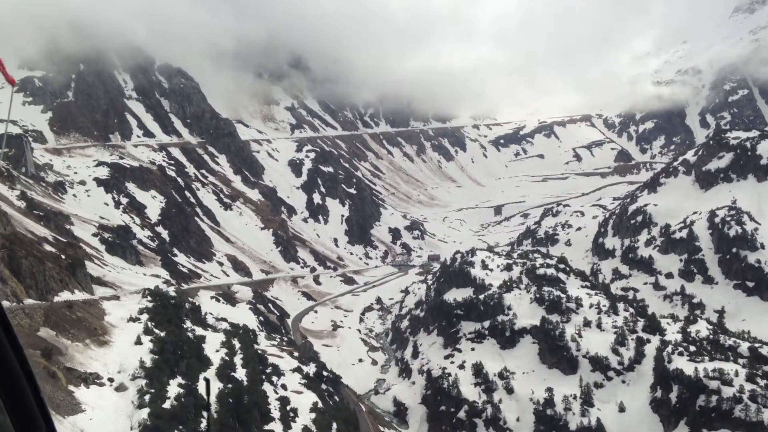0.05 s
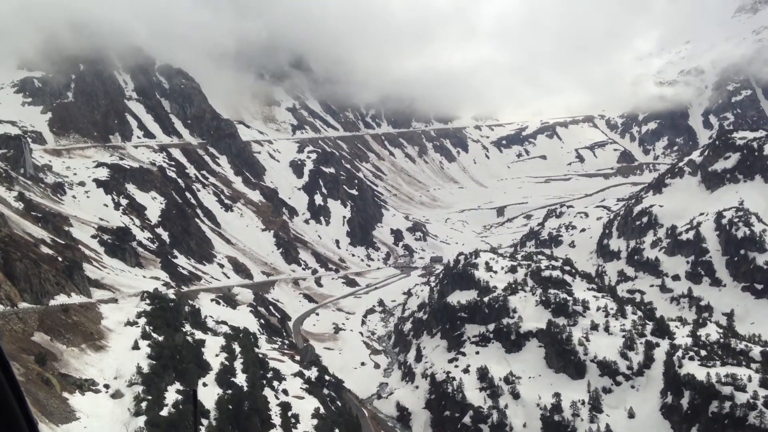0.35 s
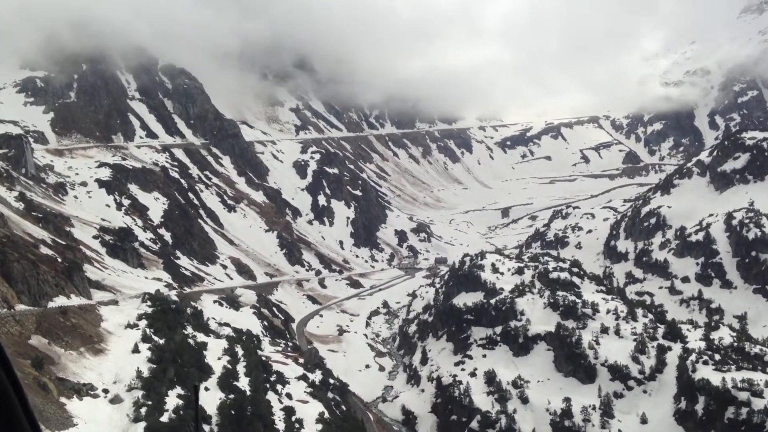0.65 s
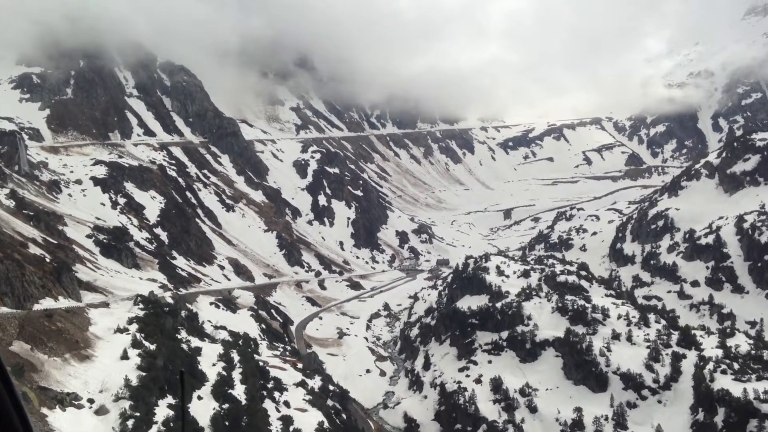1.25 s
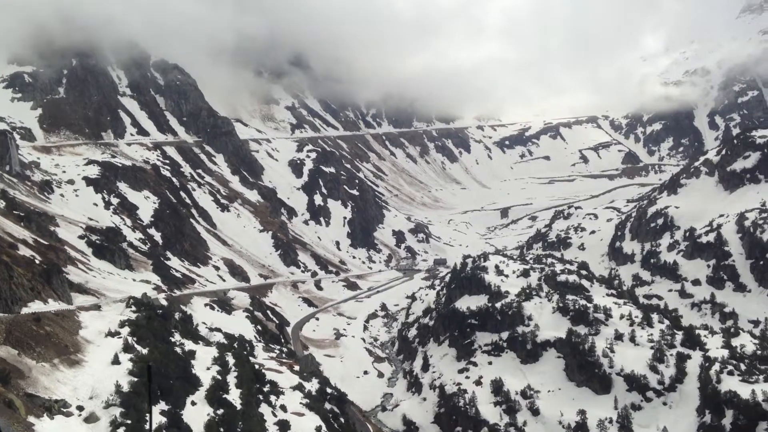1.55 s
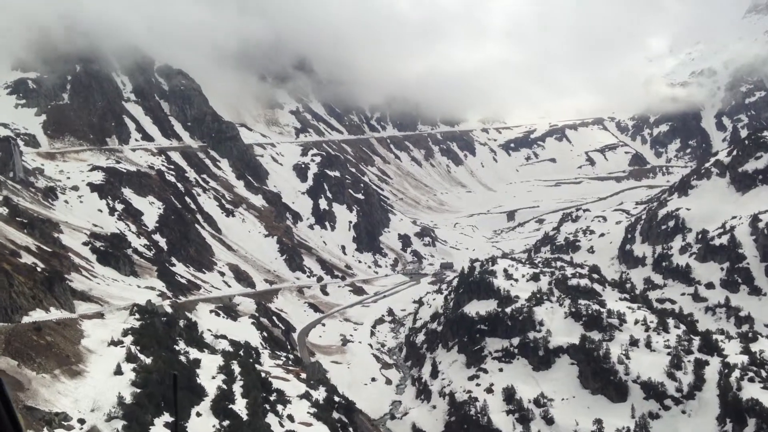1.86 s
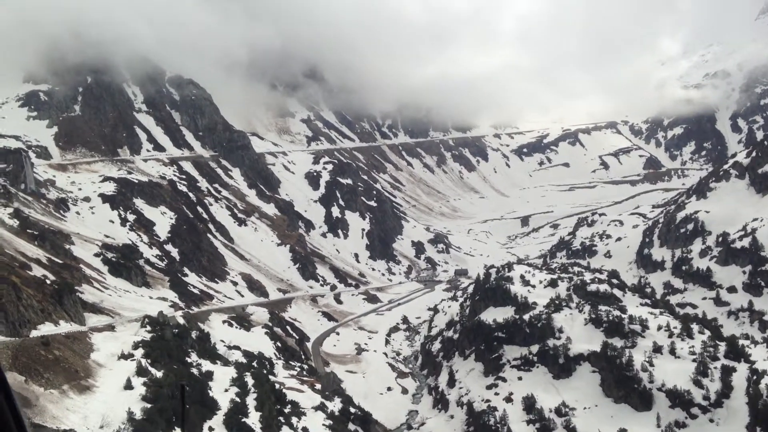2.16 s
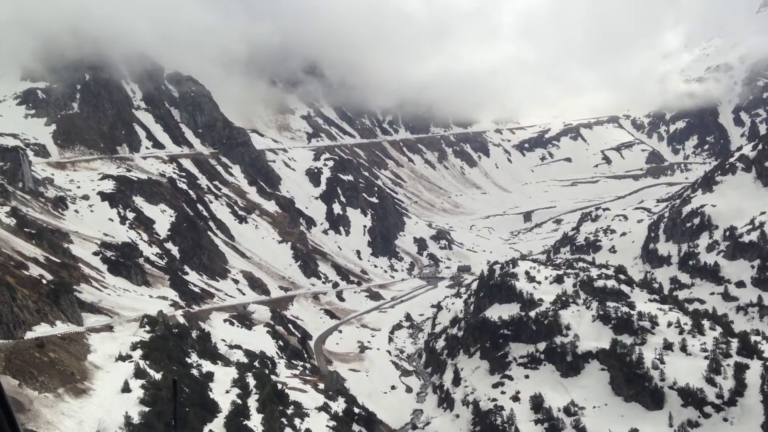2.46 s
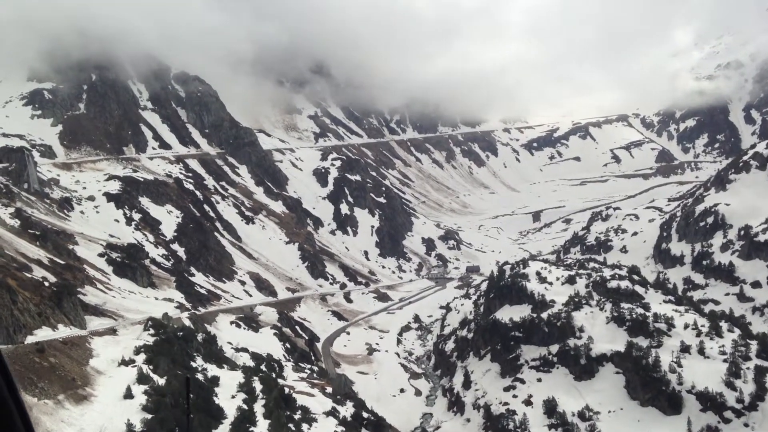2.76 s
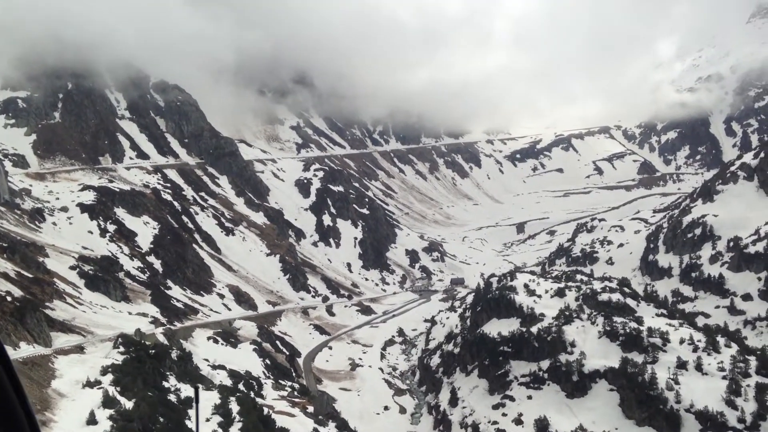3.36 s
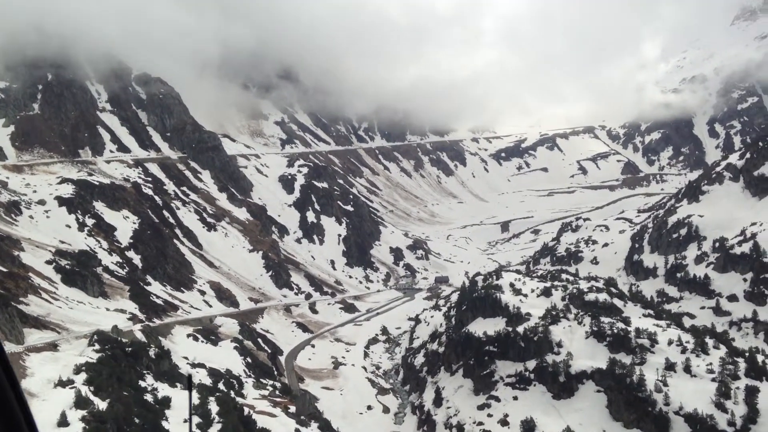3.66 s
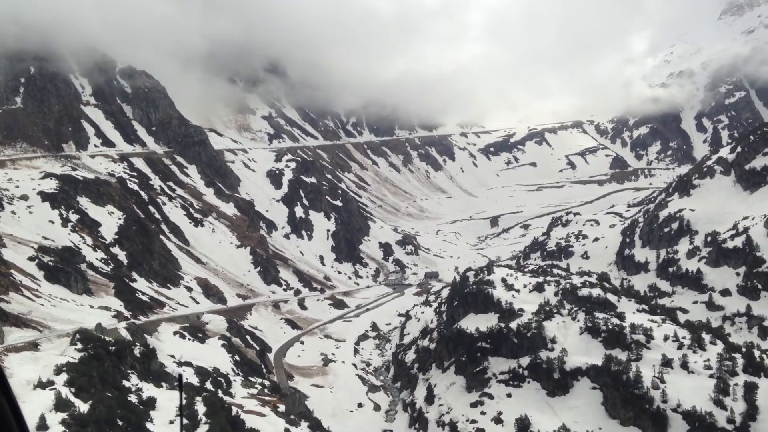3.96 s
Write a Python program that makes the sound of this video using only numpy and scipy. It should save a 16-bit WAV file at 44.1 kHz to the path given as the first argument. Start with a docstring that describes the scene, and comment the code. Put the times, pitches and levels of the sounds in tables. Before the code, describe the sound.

A helicopter heard from inside, rotor blades thudding rapidly over engine drone and rushing air.

```python
"""Helicopter cabin in cruise

Inside a light two-bladed helicopter, air roars along the hull and leaks in with a fluttering
hiss that carries a high whine. Gears sing faintly under a piston engine droning at its firing
rate. Each blade pass slaps the cabin, which booms and rings."""
import sys
import numpy as np
from scipy import signal
from scipy.io import wavfile

SR = 44100
rng = np.random.default_rng(int(sys.argv[2]) if len(sys.argv) > 2 else 0)


def generate_wav(sig):
    """Save sig (samples, or channels by samples) to the path in sys.argv[1] as 16-bit PCM at SR."""
    pcm = np.round(np.clip(np.atleast_2d(sig).T, -1, 1) * 32767).astype(np.int16)
    wavfile.write(sys.argv[1], SR, pcm)


N = 176400
TIME = np.arange(N) / SR


def from_db(db):
    """Decibels to gain."""
    return 10 ** (np.asarray(db) / 20)


def unit_rms(x):
    """Scale to an rms of 1."""
    return x / np.sqrt(np.mean(x ** 2) + 1e-20)


def curve(rows, at=TIME):
    """Read a two-column table along straight lines."""
    return np.interp(at, *np.transpose(rows))


def drift(rate_hz):
    """Smooth random motion of spread 1, mostly slower than rate_hz."""
    step, settle = 40, 2000
    pole = np.exp(-2 * np.pi * rate_hz * step / SR)
    white = rng.standard_normal(N // step + settle + 2)
    slow = signal.lfilter([1], [1, -2 * pole, pole * pole], white)[settle:]
    return np.interp(np.arange(N) / step, np.arange(len(slow)), unit_rms(slow))


def clicks(times, sizes):
    """Single-sample clicks at the given times."""
    out = np.zeros(N)
    inside = (times >= 0) & (times < (N - 1) / SR)
    out[(times[inside] * SR).astype(int)] = sizes[inside]
    return out


def ring(x, hz, t60):
    """A resonance: a unit click sets a sine of height 1 ringing."""
    r, w = np.exp(-np.log(1000) / (t60 * SR)), 2 * np.pi * hz / SR
    return signal.lfilter([0, np.sin(w)], [1, -2 * r * np.cos(w), r * r], x + 1e-18)


def fade(x, decay_s):
    """Give each click an instant attack and an exponential tail."""
    return signal.lfilter([1], [1, -np.exp(-1 / (decay_s * SR))], x + 1e-18)


def noise(colour, flicker_db=1.5):
    """Noise in narrow bands, each with its own level and flicker; rms 1."""
    edges = np.geomspace(20, 17000, 29)
    hz, db = np.transpose(colour)
    out, white = 0, rng.standard_normal((2, N))
    for k, (low, high) in enumerate(zip(edges, edges[1:])):
        band = signal.sosfilt(signal.butter(2, [low, high], "band", fs=SR, output="sos"), white[k % 2])
        band_db = np.interp(np.log(low * high) / 2, np.log(hz), db)
        out = out + band * from_db(band_db + flicker_db * drift(13.6))
    return unit_rms(out)


# Faint tones of the gears and tail rotor: f/Hz, level/dB
GEAR_TONES = [(80, -45), (597, -48.5), (774, -50.5), (1044, -54), (1206, -58.5), (1293, -52), (1830, -59.5),
              (2320, -62)]


def gears():
    """The drive train sings, each tone wavering in level and pitch."""
    out = 0
    for hz, db in GEAR_TONES:
        gain = from_db(db + 5.5 * drift(4.5))
        pitch_hz = hz + 1.91 * drift(7)
        out = out + gain * np.sin(2 * np.pi * np.cumsum(pitch_hz) / SR)
    return np.sqrt(2) * out


# Fader ride of the air roar: t/s, level/dB
ROAR_LEVEL = [(0, -19.5), (.75, -20.5), (.86, -25), (1.2, -23.5), (1.6, -29.5), (2, -27), (2.35, -23),
              (2.7, -24), (3.3, -23.5), (4, -26)]
# Its dark EQ curve: f/Hz, relative level/dB
ROAR_EQ = [(25, -14), (45, -10), (90, -8.5), (160, 4.5), (260, 0), (330, -4.5), (430, -10), (600, -10.5),
           (800, -17), (1150, -18), (1800, -27.5), (3000, -28.5), (8000, -46.5)]


def hull_roar():
    """Air rushing along the hull lays down a low bed of noise."""
    return from_db(curve(ROAR_LEVEL)) * noise(ROAR_EQ)


# Fader ride of the leak: t/s, relative level/dB
LEAK_LEVEL = [(0, -34), (.16, -30.5), (.22, -36.5), (.6, -31), (.8, -31.5), (.85, -41.5), (1.0, -37),
              (1.25, -41), (1.45, -45.5), (1.7, -46.5), (1.95, -42.5), (2.3, -41), (2.48, -37),
              (2.62, -38.5), (2.8, -40), (3.05, -38.5), (3.19, -35.5), (3.45, -39), (3.58, -39),
              (3.78, -43), (4, -38)]
# Bright EQ curve of its hiss: f/Hz, relative level/dB
HISS_EQ = [(700, -6), (1500, 3), (2800, -0.5), (4000, -4), (5500, -3.5), (7200, -4.5), (8500, -8),
           (9500, -12), (10500, -11), (12000, -15), (14000, -20), (15300, -18)]
# Spurts on top of the running flow: t/s, level/dB relative to that flow
LEAK_SPURTS = [(.115, -4.5), (0.167, -3), (.652, -13), (.695, -2), (.873, 7.5), (2.143, 3.5), (2.743, 6.5),
               (3.143, -8), (3.325, -2), (3.545, 3), (3.678, 1)]
# Resonant peaks of the whine: f/Hz, width/Hz, relative level/dB
WHINE_PEAKS = [(4600, 98, -8), (4814, 44, 2), (5075, 41, -8.5), (5790, 46, -13), (6280, 50, -11),
               (7720, 50, -4.5), (8806, 190, -3), (10120, 50, -5.5), (10300, 200, -7.5), (11100, 70, -14),
               (12605, 60, -17), (14510, 40, -20), (15230, 50, -17)]


def air_leak(firing_phase):
    """Hiss and whine share one flow that flutters, spits and throbs with the engine."""
    spits_per_s, flutter_db = 66, 2.5
    spits = (rng.random(N) < spits_per_s / SR) * rng.uniform(0, 1.9, N)
    flutter = from_db(flutter_db * drift(30.2))
    flow = unit_rms(flutter * (1 + 0.78 * fade(spits, decay_s=0.0026)))
    spurt_times, spurt_db = np.transpose(LEAK_SPURTS)
    spurts = fade(clicks(spurt_times, from_db(spurt_db)), decay_s=0.011)
    throb = 1 + 0.11 * np.sin(firing_phase)
    whine = 0
    for hz, width, db in WHINE_PEAKS:
        peak = ring(rng.standard_normal(N), hz, t60=np.log(1000) / (np.pi * width))
        whine = whine + from_db(db) * unit_rms(peak)
    air = from_db(-4) * noise(HISS_EQ) + from_db(-5) * unit_rms(whine)
    return from_db(curve(LEAK_LEVEL)) * (flow + spurts) * throb * air


# Engine pitch, set by its firing rate: t/s, f/Hz
FIRING_RATE = [(0, 136.1), (.5, 136.27), (1.2, 136.28), (2.2, 136.15), (2.7, 136.02), (3.5, 136.14),
               (4, 136.1)]
# Fader ride of the drone: t/s, relative level/dB
DRONE_LEVEL = [(0.0, -17.5), (0.03, -15.5), (0.5, -17), (0.56, -14), (0.62, -18), (0.68, -14.5),
               (0.78, -16), (0.83, -22.5), (0.98, -19.5), (1.51, -21.5), (2.47, -16.5), (2.62, -17.5),
               (3.98, -20), (4.0, -14)]
# Partials of the drone: multiple of the firing rate, relative level/dB
DRONE_PARTIALS = [(.8, -19), (1, 0), (4/3, -16), (1.5, -13), (2, -11), (3, -15), (4, -26), (8, -30)]


def engine(firing_phase):
    """The pistons fire in a clean tone with weaker, less steady partials around it."""
    out = 0
    for order, db in DRONE_PARTIALS:
        waver_db = 0.18 * drift(7.8) if order == 1 else 0.5 + 2.5 * drift(7.6)
        out = out + from_db(db + waver_db) * np.sin(order * firing_phase + rng.uniform(0, 2 * np.pi))
    return np.sqrt(2) * from_db(curve(DRONE_LEVEL) - 1) * out


def blade_hits(times, levels, lag_s=0):
    """One click per blade pass, uneven in strength; one blade tends to hit harder."""
    mismatch_db = 0.4 * (-1) ** np.arange(len(times))
    scatter_db = rng.standard_normal(len(times))
    return clicks(times + lag_s, from_db(curve(levels, times) + mismatch_db - scatter_db))


# Weight of each pass's low thump: t/s, relative level/dB
THUMP_LEVEL = [(0, -9), (.65, -10), (.8, -8), (.87, -17), (.95, -1), (1.17, -5), (1.53, 3.5), (1.62, -1),
               (1.95, 1), (2.2, -0.5), (2.35, -12), (2.56, -0.5), (2.86, 3.5), (3.3, -3), (3.45, 3.5),
               (4, -1)]
# Boom of the cabin air: f/Hz, relative level/dB, t60/s
AIR_MODES = [(205, 2, 0.061), (252, -34, 0.051)]


def cabin_boom(times):
    """Each thump and its quick echo set the cabin air booming."""
    lag_s, echo_s = 0.00067, 0.0042
    thump = blade_hits(times, THUMP_LEVEL, lag_s)
    echo = from_db(-11.5) * blade_hits(times, THUMP_LEVEL, lag_s + echo_s)
    return sum(from_db(db) * ring(thump + echo, hz, t60) for hz, db, t60 in AIR_MODES)


BOUNCE_S = 0.0061  # delay of the reflected slap
# Punch of the slap as a blade cuts a vortex: t/s, relative level/dB
SLAP_LEVEL = [(.06, -17.5), (.135, -19), (.21, -0.5), (.28, -11.5), (.65, -5.5), (.8, 0), (.87, -7),
              (.945, -13), (1.02, -4), (1.165, 1), (1.39, -1.5), (1.62, -3.5), (1.85, -1.5), (2.12, -1),
              (2.27, -3), (2.35, -9.5), (2.56, 0), (2.9, -6.5), (3.15, -1), (3.3, -6.5), (3.45, -5),
              (4, -7)]
# Ring of the panels and windows: f/Hz, relative level/dB, t60/s
PANEL_RINGS = [(403, 9.5, 0.023), (510.4, 2.5, 0.068), (637, -8, 0.035), (716, -11, 0.038),
               (995, -13.5, 0.051), (1227, -14, .03), (1255, -24, 0.051), (1505, -18, 0.059),
               (1640, -18, 0.036)]


def panel_ring(times):
    """Panels and windows ring, driven mostly by the slap's later, reflected arrival."""
    out = 0
    for i, (hz, db, t60) in enumerate(PANEL_RINGS):
        reflected = blade_hits(times, SLAP_LEVEL, BOUNCE_S)
        direct = from_db(-15) * blade_hits(times, SLAP_LEVEL)
        out = out + (-1) ** i * from_db(db) * ring(reflected - direct, hz, t60)
    return out


# Tempo of the main rotor's blade passes: t/s, f/Hz
BLADE_RATE = [(0, 13.58), (1.3, 13.582), (1.6, 13.592), (2.1, 13.608), (2.5, 13.605), (2.7, 13.557),
              (4, 13.555)]
# Bite of the shock and crack: t/s, relative level/dB
CRACK_LEVEL = [(0, -14), (.65, -6), (.8, 6.5), (.9, -9), (1.17, -2.5), (1.46, -5.5), (1.75, 2),
               (2.12, -1.5), (2.35, -6), (2.56, 3), (2.86, 4.5), (3.2, 3), (3.3, -2.5), (3.45, 1), (4, 0.5)]
# Midrange EQ curve of the crack: f/Hz, relative level/dB
CRACK_EQ = [(300, -12), (600, 15.5), (850, -19.5), (1200, 9.5), (1600, -18), (2000, -11.5), (3000, -20),
            (6000, -35), (12000, -56)]


def rotor():
    """Each blade pass sends a shock and a crack into the cabin and sets air and panels ringing."""
    first_slap_s = 0.0605
    passes = np.cumsum(curve(BLADE_RATE)) / SR
    times = first_slap_s + np.interp(np.arange(int(passes[-1])), passes, TIME)
    boom, panels = cabin_boom(times), panel_ring(times)
    reflected = from_db(-7.5) * blade_hits(times, CRACK_LEVEL, BOUNCE_S)
    shock = ring(reflected - blade_hits(times, CRACK_LEVEL), hz=595, t60=0.0029)
    crack = fade(blade_hits(times, CRACK_LEVEL), decay_s=0.015) * noise(CRACK_EQ, flicker_db=-1.5)
    body = from_db(-9.5) * boom + from_db(-12) * panels + from_db(-7) * shock
    cabin_band = signal.butter(2, (120, 2040), "band", fs=SR, output="sos")
    return signal.sosfilt(cabin_band, body) + from_db(-22.5) * crack


def scene():
    """Air, rotor, engine and gears in mono, heard from a seat in the cabin."""
    firing_phase = 2 * np.pi * np.cumsum(curve(FIRING_RATE)) / SR
    return (hull_roar() + rotor() + engine(firing_phase) + gears() + air_leak(firing_phase))[None]


def record(dry):
    """A soft clip rounds the highest peaks and a steep low-pass cuts the top."""
    ceiling, cutoff_hz = 0.72, 15400
    rounded = dry / (1 + (dry / ceiling) ** 8) ** (1 / 8)
    return signal.sosfilt(signal.ellip(12, .1, 80, cutoff_hz, fs=SR, output="sos"), rounded)


dry = scene()
out = record(dry)
generate_wav(out)
```